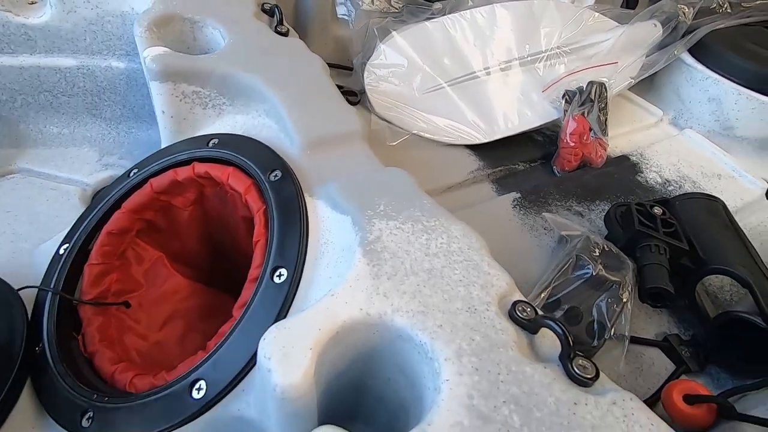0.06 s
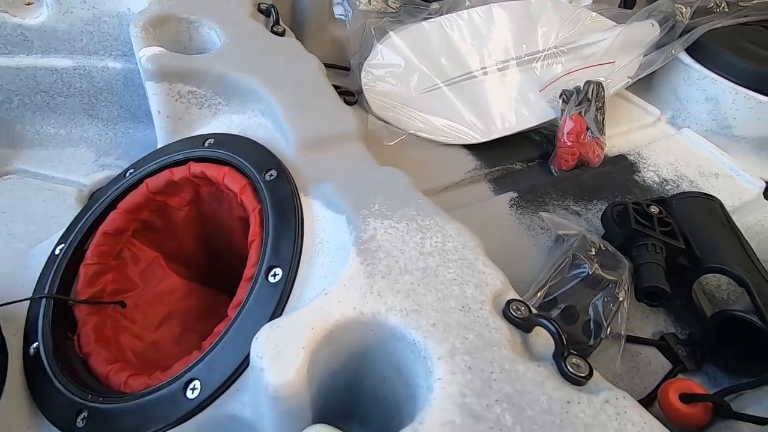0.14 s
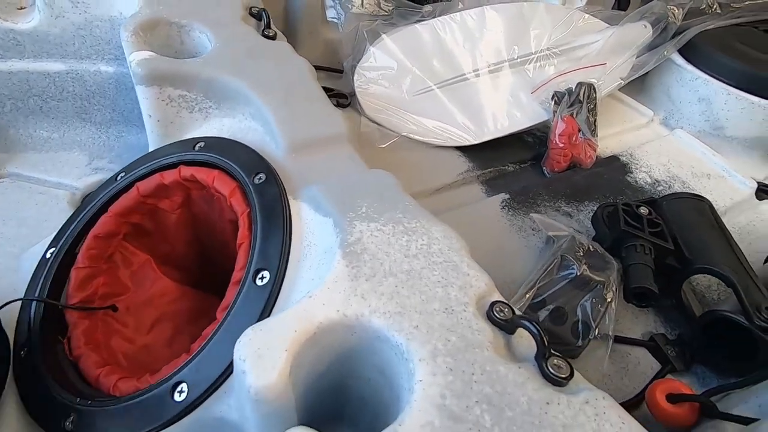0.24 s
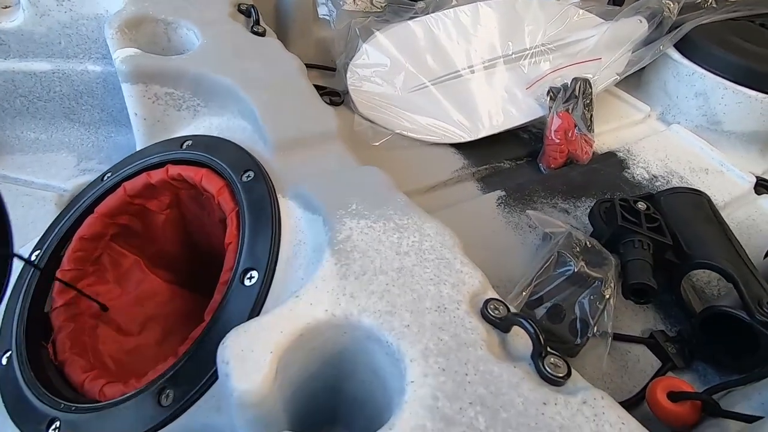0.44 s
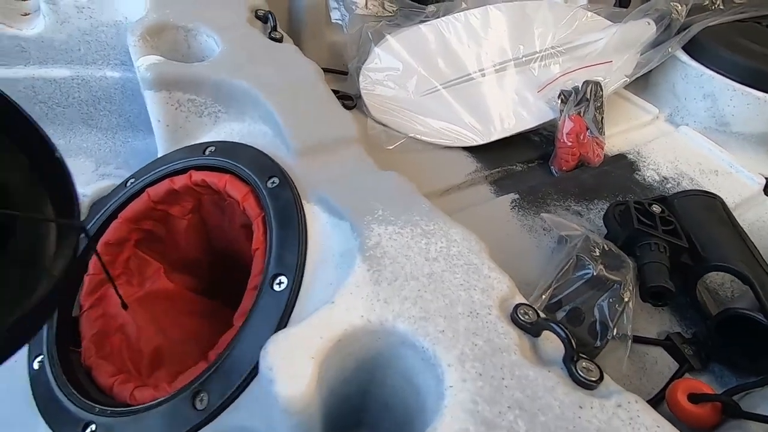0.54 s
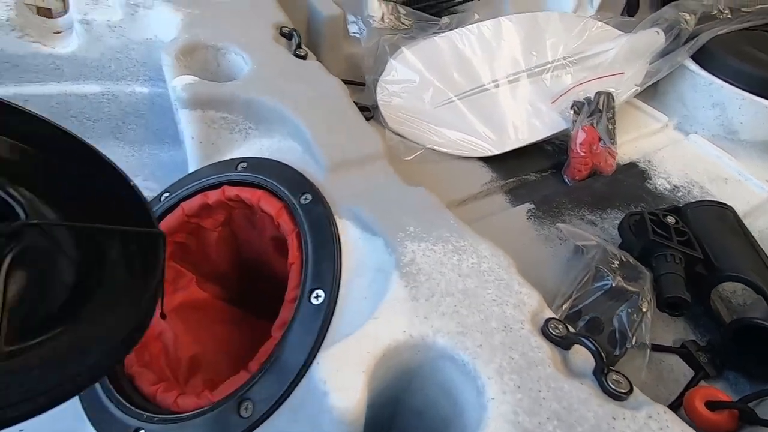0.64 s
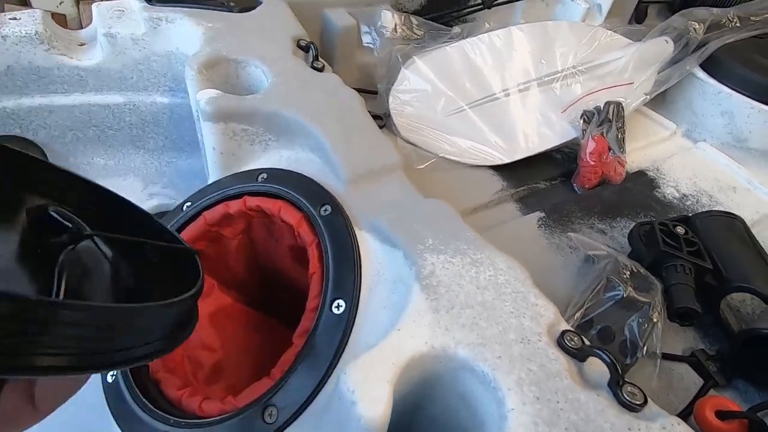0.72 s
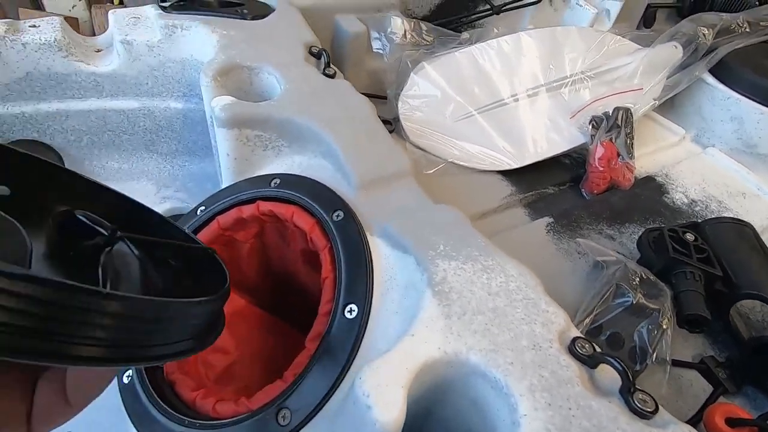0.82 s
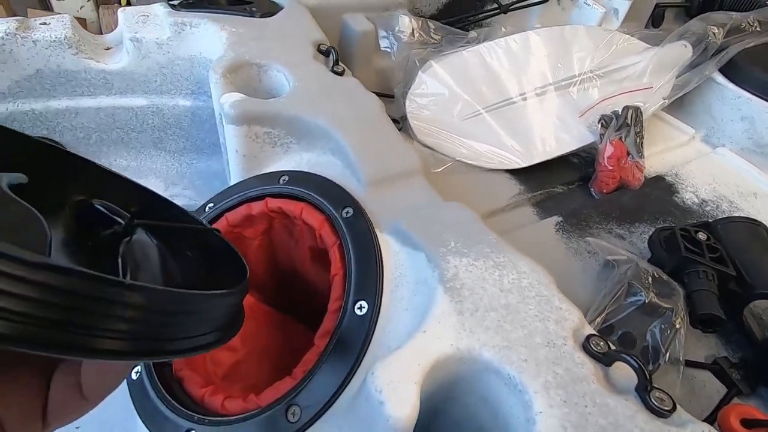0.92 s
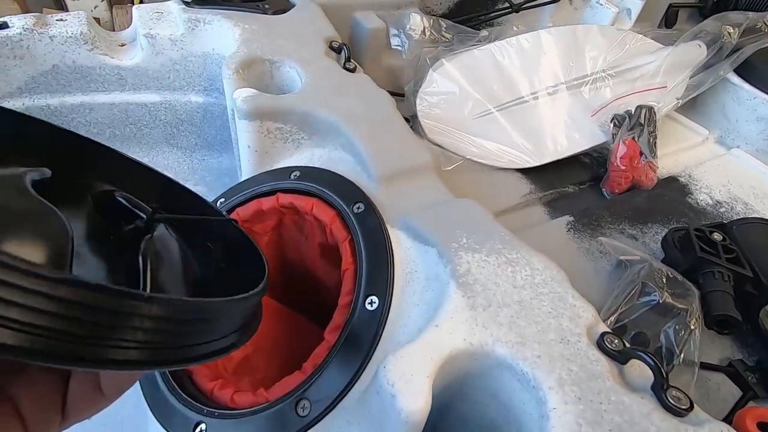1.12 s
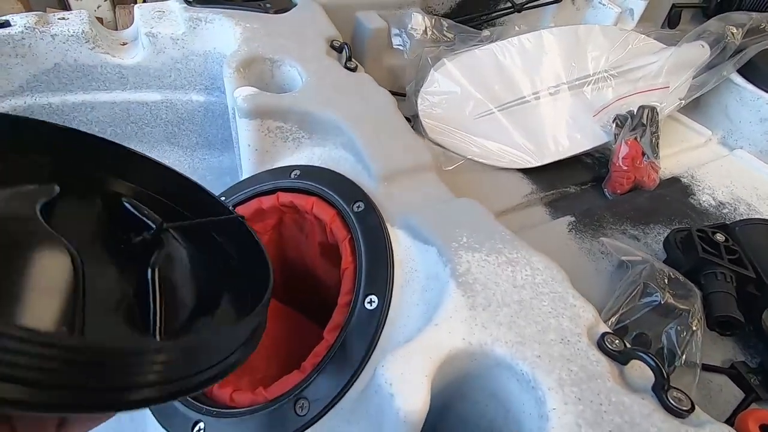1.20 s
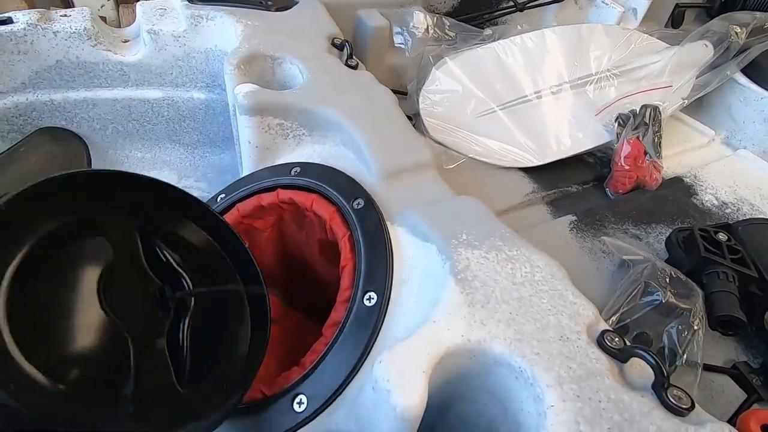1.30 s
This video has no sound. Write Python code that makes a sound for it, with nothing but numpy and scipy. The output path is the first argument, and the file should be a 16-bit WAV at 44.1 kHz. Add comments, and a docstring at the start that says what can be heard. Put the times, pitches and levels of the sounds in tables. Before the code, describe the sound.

A plastic hatch lid knocks free of a hollow kayak, then rubs and creaks softly.

```python
"""Lifting a kayak's hatch lid

A plastic lid is picked up from a moulded kayak, close to the microphone. Its tether zips
through a fabric liner. Stick-slip friction on the rim and a few impacts excite the modes of
the lid and the hollow hull. The lid ticks as it comes free, hisses past the liner, then
rubs and creaks softly in the hand."""
import sys
import numpy as np
from scipy import signal
from scipy.fft import rfft, irfft
from scipy.io import wavfile
from scipy.ndimage import uniform_filter1d

SR = 44100
rng = np.random.default_rng(int(sys.argv[2]) if len(sys.argv) > 2 else 0)


def unload_audio(sound):
    """Save the sound as a 16-bit wav file, at the path given as the first command line argument."""
    columns = np.transpose(np.atleast_2d(sound))
    # keep every value between -1 and 1, then stretch to whole-number steps
    steps = np.round(np.clip(columns, -1, 1) * 32767)
    wavfile.write(sys.argv[1], SR, steps.astype(np.int16))


N = 59535
T = np.arange(N) / SR
BRIEF = np.arange(N // 12) / SR


def undb(db):
    """Decibels to amplitude ratio."""
    return np.exp(np.asarray(db) * (np.log(10) / 20))


def unit(x):
    """Normalisation to rms 1."""
    return x / np.sqrt(np.mean(x ** 2))


def ring(x, response):
    """Linear response: convolution of a force with an impulse response."""
    return signal.fftconvolve(x, response)[:len(x)]


def resonate(x, response):
    """Convolution with a response of unit energy, which keeps the power of white noise."""
    return ring(x, response / np.linalg.norm(response))


def colour(x, points):
    """Minimum-phase filter through (f/Hz, relative gain/dB) points, by folding the cepstrum."""
    hz, db = np.array(points).T
    size = 4096
    f = np.maximum(np.arange(size // 2 + 1) * SR / size, 1)
    gain = undb(np.interp(np.log(f), np.log(hz), db))
    cepstrum = irfft(np.log(gain))
    cepstrum[1:size // 2] *= 2
    cepstrum[size // 2 + 1:] = 0
    return resonate(x, irfft(np.exp(rfft(cepstrum))))


def noise(n=N):
    """White noise, rms 1."""
    return rng.standard_normal(n)


def fade(t60, t):
    """Exponential decay of 60 dB in t60 seconds."""
    return np.exp(-np.log(1000) * t / t60)


def burst(t60, t=BRIEF):
    """Diffuse decay: exponentially damped noise."""
    return noise(len(t)) * fade(t60, t)


def modes(table, t=BRIEF):
    """Modal superposition: an impulse response as a sum of damped sinusoids."""
    return sum(undb(db) * np.sin(2 * np.pi * hz * t) * fade(t60, t) for hz, db, t60 in table)


def flex(hz, cycles):
    """Flexural transient: a panel's swing swells over some cycles and dies away."""
    age = BRIEF * hz / cycles
    return age ** 2 * np.exp(2 - 2 * age) * np.sin(2 * np.pi * hz * BRIEF)


def at(s, x):
    """Delay of a short sound by s seconds."""
    start = max(int(s * SR), 0)
    return np.pad(x, (start, max(N - start - len(x), 0)))[:N]


def curve(points):
    """Envelope through (t/s, level/dB) points, silent outside them."""
    s, db = np.array(points).T
    return undb(np.interp(T, s, db)) * (T >= s[0]) * (T <= s[-1])


def stroke(s, db, rise, fall):
    """Contact pressure with a linear rise and an exponential decay."""
    return undb(db) * np.clip((T - s) / rise, 0, 1) * np.exp(-np.maximum(T - s - rise, 0) / fall)


def slips(per_s, scatter_db, uneven):
    """Stick-slip pulses of log-normal spacing and size, rms 1."""
    gap, size = rng.standard_normal((N // 10, 2)).T
    where = (np.cumsum(np.exp(uneven * gap)) * SR / per_s).astype(int)
    keep = where < N
    return unit(np.bincount(where[keep], undb(scatter_db * size[keep]), N))


# Strokes on hull and lid: t/s, level/dB, rise/s, decay/s
RUBS = [(0, -41.5, 0.00057, 0.051), (.25, -35, 0.011, 0.058), (.44, -62, 0.032, 0.21),
        (.552, -51.5, 0.039, 0.045), (.66, -60, 0.018, 0.2), (.96, -71, 0.0072, 0.032)]
# Rub spectrum: f/Hz, level/dB
RUB_SPECTRUM = [(30, -8.5), (60, -9), (110, 5), (170, 1), (390, 0), (600, -6), (850, -5), (1400, -17),
                (2000, -26.5), (4000, -29.5), (10000, -50.5)]


def rubs():
    """Sliding friction: irregular slips and noise make dull rubs on hull and lid."""
    pressure = sum(stroke(*rub) for rub in RUBS)
    friction = (slips(450, scatter_db=1, uneven=.7) + noise()) / np.sqrt(2)
    return colour(pressure * friction, RUB_SPECTRUM)


# Pitch of the weave, following the cord's speed: t/s, f/Hz
WEAVE_PITCH = [(0, 10300), (.04, 10600), (.07, 11000), (.10, 11700), (.125, 12020), (.16, 11880),
               (.215, 11700)]
# Strands: pitch ratio, drift of the ratio/(1/s), level/dB, start/s, end/s
STRANDS = [(1, 0, -85, .02, .07), (1, 0, -72, .065, .198), (.96, -1.2, -78, .078, .16),
           (1.2, 0, -80, 0, .06), (1.19, 0, -83, .06, .2), (1.16, -.4, -84, .05, .19),
           (1.1, 0, -85, .09, .2)]
# Spectrum of the cord's hiss: f/Hz, level/dB
TETHER_SPECTRUM = [(150, 2), (360, 5), (700, -9), (1000, -3.5), (1400, -1.5), (2400, -12), (2980, -3),
                   (3600, -14), (6000, -19.5), (9000, -29.5), (15000, -35)]


def tether():
    """Periodic excitation: the cord's woven strands catch on fabric, a thin zip over a dry hiss."""
    jitter, fade_s = .0036, .0059
    s, hz = np.array(WEAVE_PITCH).T
    t = T[:N // 5]
    pitch = np.interp(t, s, hz)
    sound = undb(-54.5) * colour(noise(len(t)), TETHER_SPECTRUM)
    for ratio, drift, db, start, end in STRANDS:
        waver = 1 + jitter * unit(uniform_filter1d(noise(len(t)), size=40))
        strand_hz = (ratio + drift * (t - start)) * pitch * waver
        touching = np.clip(np.minimum(t - start, end - t) / fade_s + .5, 0, 1)
        sound += undb(db) * touching * np.sin(2 * np.pi * np.cumsum(strand_hz) / SR)
    return at(0, sound * np.clip((s[-1] - t) / fade_s, 0, 1))


# Background spectrum: f/Hz, level/dB
AIR_SPECTRUM = [(18, -30), (30, -10.5), (195, -5), (228, -6), (296, -10), (448, -9.5), (645, -7),
                (774, -8.5), (928, -8.5), (1000, -12), (15000, -43.5)]


def room_air():
    """Stationary noise: the quiet air of the room."""
    return undb(-65.5) * colour(noise(), AIR_SPECTRUM)


# Knocks on the deck: t/s, level/dB, dent f/Hz, contact time/s
KNOCKS = [(0.016, -40, 250, 0.00047), (0.063, -41.5, 182, 0.0029), (.190, -32.5, 127, 0.0018),
          (0.2295, -27, 111, 0.0062), (0.2316, -17, 236, .0017), (0.2402, -11, 370, 0.00102),
          (.257, -23, 433, 0.0027), (0.2684, -25.5, 298, 0.0031), (0.29, -38.5, 178, 0.0018),
          (0.2974, -30.5, 540, 0.0011), (.554, -50.5, 147, 0.0012), (.594, -40.5, 750, 0.002),
          (0.676, -54, 290, 0.0004)]
# Hull modes: f/Hz, level/dB, T60/s
HULL_MODES = [(115, -16, 1), (181.7, -9.5, 0.65), (214.1, 4, 0.23), (260, -3.5, 0.15), (288.4, -1, 0.24),
              (408, 4.5, 0.32), (484.8, 1.5, 0.3), (526, -13, 0.093), (590, -14, .2), (626, -10, 0.17),
              (786, -15, 0.13), (890, -11.5, 0.16), (994, -7, 0.28)]
# Spectrum of the hull's hollow: f/Hz, level/dB
CAVITY_SPECTRUM = [(40, -37), (90, -11), (180, -3.5), (400, 3.5), (900, -23.5), (1500, -14), (2100, -23.5),
                   (3800, -23.5), (8000, -44)]


def knocks():
    """Impact excitation: the deck dents briefly; hull and cavity ring, duller for a longer contact."""
    dents, force = np.zeros((2, N))
    for s, db, hz, contact in KNOCKS:
        dents += at(s, undb(db) * flex(hz, cycles=.59))
        push = np.sin(np.pi * np.minimum(BRIEF / contact, 1)) ** 2
        force += at(s, undb(db) * push / push.sum())
    cavity = colour(noise(), CAVITY_SPECTRUM) * fade(t60=.33, t=T)
    response = undb(-25.5) * modes(HULL_MODES, T) + undb(-25) * cavity
    return dents + ring(force, response[:N // 2])


# Friction force on the rim: t/s, level/dB
SCRAPE_FORCE = [(.18, -70), (.183, -46), (.195, -41.5), (.206, -36.5), (.218, -30.5), (.236, -29),
                (.245, -43.5), (.265, -66.5), (.315, -54), (.345, -66)]
# Scrape spectrum: f/Hz, level/dB
SCRAPE_SPECTRUM = [(40, -36), (100, -5.5), (200, 2.5), (270, 3), (420, 2.5), (560, -5), (800, 0),
                   (1050, -7.5), (1450, -19.5), (2000, -28.5), (2650, -21.5), (3600, -11), (4400, -21.5),
                   (5600, -34.5), (7000, -33), (15000, -51.5)]
# Lid modes, also struck by the ticks: f/Hz, level/dB, T60/s
LID_MODES = [(792.4, 13, 0.067), (1004, -20, 0.068), (1378, -2, 0.037), (1640, -38, 0.02),
             (2630, -28, 0.047), (3350, -10.5, 0.041), (3800, -32, 0.076), (3900, -8, .06)]


def scrape():
    """Stick-slip friction: the lid's edge catches on the rim; the lid rings and a short diffuse tail trails it."""
    force = curve(SCRAPE_FORCE) * (slips(780, scatter_db=2, uneven=.45) + undb(-3) * noise())
    scattered = undb(-5.5) * resonate(force, burst(t60=.14))
    lid = undb(-4.5) * resonate(force, modes(LID_MODES))
    return colour(force + scattered, SCRAPE_SPECTRUM) + lid


# Landings and rebounds of the lid's edge: t/s, level/dB, f/Hz, swell/cycles
CLACKS = [(.1803, -36, 847, 3.6), (.2965, -37.5, 782, 2.3), (.3105, -38, 898, 3.3),
          (0.4103, -41, 1030, 1.2), (0.4297, -34.5, 1064, 0.93)]


def clacks():
    """Flexural vibration: the lid's edge meets the rim and bends at a pitch set by where it lands."""
    return sum(at(s, undb(db) * flex(hz, cycles)) for s, db, hz, cycles in CLACKS)


# Light contacts: t/s, body level/dB, snap level/dB, local ring f/Hz, local ring level/dB
TICKS = [(0.1807, -57, -37, 940, -69), (.217, -52, -49, 3350, -42), (.2302, -30, -42, 3800, -35.5),
         (.2375, -27, -55, 4040, -37), (0.2435, -23.5, -40, 1377, -36.5), (0.291, -35, -44, 4180, -47),
         (.2975, -38, -59, 3370, -56), (0.314, -46, -57, 1050, -57), (0.41, -37, -42.5, 2700, -51.5),
         (0.4296, -30, -42, 4050, -46), (0.439, -35, -44.5, 850, -66), (.4665, -41, -35, 3380, -48),
         (0.5548, -46, -47.5, 4100, -71), (.567, -60, -40.5, 4300, -73), (.693, -70, -49, 3760, -57),
         (0.77, -62, -55, 2720, -56)]
# Spectra of a tick's body and of its bright snap: f/Hz, level/dB
BODY_SPECTRUM = [(150, -43), (550, -11), (850, 7.5), (1250, 3), (1650, -1.5), (2050, -49), (2750, -5.5),
                 (4100, -21), (5000, -39.5), (15000, -44)]
SNAP_SPECTRUM = [(500, -24), (2000, -10), (3300, 2.5), (4300, 11.5), (5500, -9.5), (7000, -2), (11000, -16),
                 (15000, -17)]


def ticks():
    """Impulse response: a hard click scatters in the plastic and rings the lid and the touched spot."""
    body, snap, force, local = np.zeros((4, N))
    for s, body_db, snap_db, hz, ring_db in TICKS:
        click = at(s, np.ones(1))
        force += undb(body_db) * click
        body += undb(body_db) * (2.16 * click + .27 * at(s, burst(t60=.044)))
        snap += undb(snap_db) * (.98 * click + .25 * at(s, burst(t60=.022)))
        local += at(s, modes([(hz, ring_db, .035)]))
    lid = undb(-23.5) * ring(force, modes(LID_MODES))
    return colour(body, BODY_SPECTRUM) + colour(snap, SNAP_SPECTRUM) + lid + local


# Envelopes of the liner's hiss and of its top octave: t/s, level/dB
SWISH_LEVEL = [(.3, -69.5), (.38, -66.5), (.5, -64), (.58, -59.5), (.66, -63.5), (.74, -66), (.8, -67.5),
               (.86, -68.5), (1.1, -71.5), (1.35, -70.5)]
TREBLE_LEVEL = [(.56, -80), (.66, -72), (.74, -72.5), (.8, -81)]
# Their spectra: f/Hz, level/dB
SWISH_SPECTRUM = [(500, -0.5), (1300, 6.5), (2200, 0), (4000, 2.5), (5400, -3.5), (6800, -2.5), (9000, -11),
                  (12000, -14.5), (15000, -22)]
TREBLE_SPECTRUM = [(4000, -32), (7000, 6), (12300, -1), (14500, -11)]


def swish():
    """Roughness noise: fine grains of friction on the liner, airier while the lid slides fastest."""
    grains = curve(SWISH_LEVEL) * (noise() + .45 * slips(1200, scatter_db=0, uneven=.8))
    treble = curve(TREBLE_LEVEL) * noise()
    return colour(grains, SWISH_SPECTRUM) + colour(treble, TREBLE_SPECTRUM)


# Creaks in the hand: t/s, level/dB, rise/s, decay/s, ring f/Hz, ring level/dB
CREAKS = [(.821, -48.5, 0.01, 0.012, 1374, -6), (.868, -62, 0.016, 0.012, 1507, 10),
          (1.305, -60.5, 0.009, 0.035, 1410, -2)]
# Creak spectrum: f/Hz, level/dB
CREAK_SPECTRUM = [(200, -1), (800, -3.5), (1400, 4), (1950, -15), (2800, -15), (4400, -4), (5500, -14),
                  (6500, -10), (15000, -33)]
# Modes of the gripped lid: f/Hz, level/dB, T60/s
GRIPPED_MODES = [(2910, -10, 0.04), (3520, -10, 0.03), (3930, -8, 0.063)]


def creaks():
    """Forced vibration: near-regular slips drive the gripped lid, each creak adding its own mode."""
    sound = np.zeros(N)
    for s, db, rise, fall, hz, ring_db in CREAKS:
        friction = (slips(700, scatter_db=5.5, uneven=.24) + noise()) / np.sqrt(2)
        force = stroke(s, db, rise, fall) * friction
        lid = modes(GRIPPED_MODES + [(hz, ring_db, .14)])
        sound += undb(-5.5) * colour(force, CREAK_SPECTRUM) + undb(-3.5) * resonate(force, lid)
    return sound


def scene():
    """Superposition: the pressures of all sources add in one channel."""
    mix = rubs() + tether() + room_air() + knocks() + scrape() + clacks() + ticks() + swish() + creaks()
    return mix[None]


def record(dry):
    """Band limiting: the microphone sheds the deep bass and cuts the top."""
    highpass = signal.butter(2, 50, "high", fs=SR, output="sos")
    lowpass = signal.ellip(10, .2, 70, 15650, fs=SR, output="sos")
    return signal.sosfilt(lowpass, signal.sosfilt(highpass, dry))


dry = scene()
out = record(dry)
unload_audio(out)
```